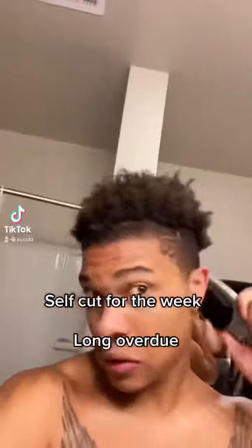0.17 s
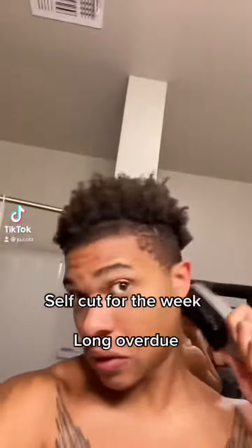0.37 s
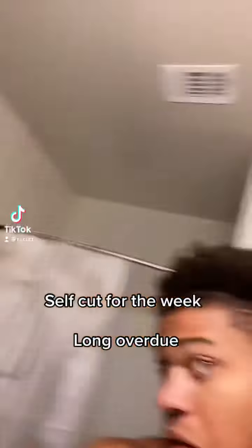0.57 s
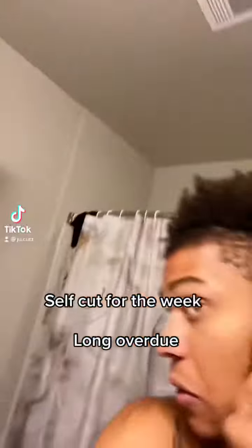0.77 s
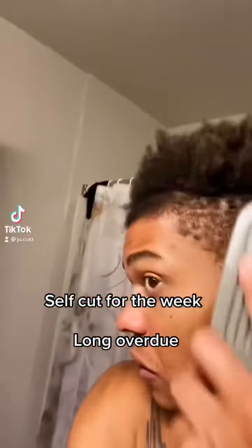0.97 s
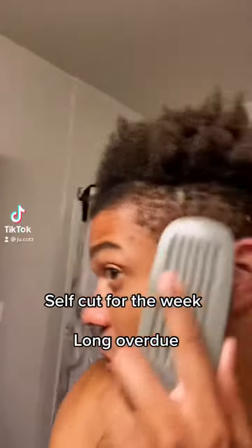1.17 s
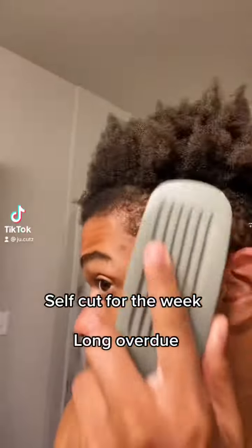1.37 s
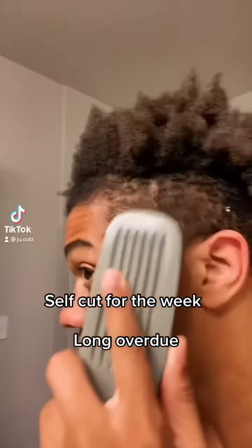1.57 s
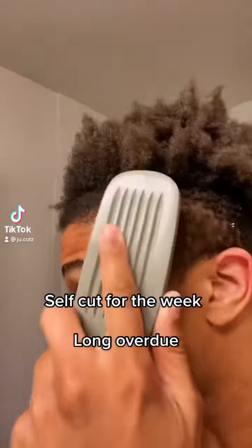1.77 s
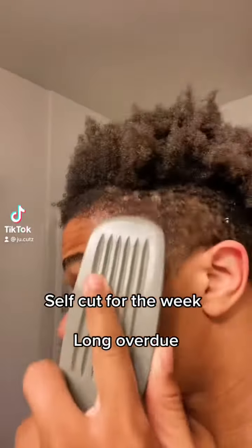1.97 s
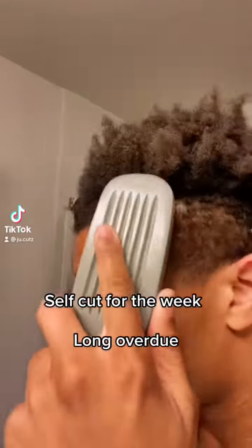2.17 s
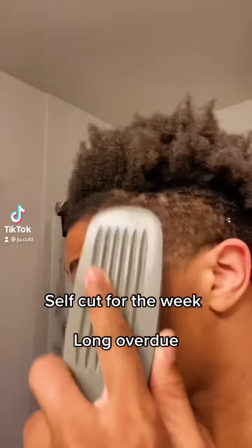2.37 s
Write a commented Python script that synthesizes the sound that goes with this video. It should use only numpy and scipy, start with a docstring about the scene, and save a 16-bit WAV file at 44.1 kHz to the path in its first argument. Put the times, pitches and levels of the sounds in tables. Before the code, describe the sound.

A bristle brush sweeps over short hair six times in a small bathroom, at about 0.3, 0.8, 1.2, 1.5, 1.9 and 2.3 seconds. Light scuffs come before most of these short, dry rasps. The second stroke is the loudest and crackles as bristles snag near 0.9 seconds. A low motor hum and rumble runs underneath, and a faint, thin whistle comes and goes between 0.5 and 1.5 seconds.

```python
"""A bristle brush is swept six times over short hair in a small bathroom.
Each stroke is thousands of tiny bristle flicks, ringing in the hollow between brush and head.
The brush touches down lightly before most strokes and snags most in the hardest one.
Behind it a mains motor (idling clippers or a ceiling fan) hums and rumbles,
and a thin whistle comes and goes."""
import sys
import numpy as np
from scipy import signal
from scipy.fft import rfft, irfft
from scipy.io import wavfile

SR = 44100
rng = np.random.default_rng(int(sys.argv[2]) if len(sys.argv) > 2 else 0)


def inscribe(sig):
    """Save sig as 16-bit PCM at rate SR to the path in sys.argv[1].

    A 1-D sig is mono; a 2-D sig holds one channel per row.
    Samples are clipped to [-1, 1] before scaling.
    """
    pcm = np.round(np.clip(np.atleast_2d(sig).T, -1, 1) * 32767)
    wavfile.write(sys.argv[1], SR, pcm.astype(np.int16))


N = 106854

# The tone of bristles rubbing on hair, from low to high: pitch_hz, level_db
BRISTLE_TONE = [(150, -24), (400, -8), (680, -13.5), (870, -4.5), (1100, -11.5), (1450, -5.5), (1800, -1.5),
                (2500, 0.5), (3200, -1), (4000, -6.5), (5400, -8.5), (6300, -12), (8200, -12),
                (10500, -16.5), (13000, -16.5), (16000, -21.5)]


def from_db(db):
    """Turn decibels into a number to multiply by."""
    return 10 ** (np.asarray(db) / 20)


def unit_power(x):
    """Scale a sound so that its average power is 1."""
    return x / np.sqrt(np.mean(x ** 2) + 1e-20)


def clock():
    """The time of every sample, in seconds."""
    return np.arange(N) / SR


def join_points(rows):
    """Draw straight lines between timed rows: one curve for each column after the time."""
    times, *columns = np.transpose(rows)
    return [np.interp(clock(), times, column) for column in columns]


def shape_tone(x, points):
    """Make each pitch as strong as a tone table says, with nothing below 20 Hz; power 1."""
    hz, db = np.transpose(points)
    freqs = np.maximum(np.fft.rfftfreq(N, 1 / SR), 1)
    gain = from_db(np.interp(np.log(freqs), np.log(hz), db)) * (freqs > 20)
    return unit_power(irfft(rfft(x) * gain, N))


def drift(turns_per_s):
    """A random wander, roughly between -1 and 1."""
    points = rng.standard_normal(500)
    return np.interp(clock() * turns_per_s, np.arange(len(points)), points)


def resonate(x, hz, width_hz):
    """Let a sound ring at one pitch; a narrower width rings longer."""
    r = np.exp(-np.pi * width_hz / SR)
    feed = np.array([1, 0, -1]) * (1 - r * r) / 2
    feedback = [1, -2 * r * np.cos(2 * np.pi * hz / SR), r * r]
    return signal.lfilter(feed, feedback, x + 1e-18)


def tone_knobs(x, bass_db=0, treble_db=0, sizzle_db=0):
    """Turn the bass, the treble and the sizzle at the very top up or down."""
    bass_hz, treble_hz, sizzle_hz = 1280, 3900, 11000
    freqs = np.fft.rfftfreq(N, 1 / SR)
    bass = 1 / (1 + (freqs / bass_hz) ** 4)
    treble = 1 - 1 / (1 + (freqs / treble_hz) ** 4)
    sizzle = 1 - 1 / (1 + (freqs / sizzle_hz) ** 12)
    return irfft(rfft(x) * from_db(bass_db * bass + treble_db * treble + sizzle_db * sizzle), N)


def motor():
    """A motor hums at twice the mains rate, over a rumble of moving air."""
    # How loud the motor is over time: time_s, hum_db, air_db
    levels = [(.115, -83, -86.5), (.165, -58.5, -63.5), (.24, -51, -60), (.42, -49, -58), (.65, -45.5, -54),
              (.8, -44.5, -49), (.96, -43.5, -50.5), (1.12, -48.5, -54.5), (1.35, -50.5, -57.5),
              (1.9, -51, -57.5), (2.42, -50.5, -57.5)]
    # The pure tones in the hum: multiple (of hum_hz), level_db
    hum_tones = [(1, -2.5), (2, -20.5), (3, -36)]
    # The tone of the moving air: pitch_hz, level_db
    air_tone = [(25, -16.5), (45, -9.5), (68, -2), (95, -7), (130, -12.5), (200, -19), (300, -16),
                (450, -18.5), (700, -21.5), (1500, -27.5), (3000, -32), (7000, -38.5), (15000, -49)]
    # The ringing of duct and room: pitch_hz, width_hz, level_db
    air_rings = [(71, 15, -3), (160.4, 5.6, -10), (292.4, 16, -10.5), (347, 4, -12.5)]
    hum_hz, waver_db = 120, 0.4
    hum_db, air_db = join_points(levels)
    hum = 0
    for multiple, level_db in hum_tones:
        gain = from_db(level_db + waver_db * drift(12.32)) * np.sqrt(2)
        hum += gain * np.sin(2 * np.pi * (multiple * hum_hz * clock() + rng.random()))
    air = shape_tone(rng.standard_normal(N), air_tone)
    for pitch_hz, width_hz, level_db in air_rings:
        air += from_db(level_db) * unit_power(resonate(rng.standard_normal(N), pitch_hz, width_hz))
    started = clock() > levels[0][0]
    return (from_db(hum_db) * hum + from_db(air_db) * unit_power(air)) * started


def whistle():
    """One thin, slightly unsteady tone swells and fades."""
    # How loud the whistle is over time: time_s, level_db
    levels = [(.4, -102), (.47, -70.5), (.62, -68), (.69, -56), (.75, -59.5), (.9, -65.5), (1.04, -63.5),
              (1.12, -64), (1.33, -86), (1.43, -77), (1.6, -97)]
    pitch_hz, waver_hz = 3604, 6.5
    level_db, = join_points(levels)
    cycles = np.cumsum(pitch_hz + waver_hz * drift(30)) / SR
    started = clock() > levels[0][0]
    return from_db(level_db) * np.sqrt(2) * np.sin(2 * np.pi * cycles) * started


def bathroom(x):
    """Close walls add a quick wash of echoes, whose treble lasts slightly longer."""
    low_fade_s, high_fade_s = 0.3, 0.36  # time to fall by 60 dB
    echo_db, delay_s, split_hz = -10, 0.004, 4000
    t = clock()[:SR // 2]
    noise = rng.standard_normal(len(t))
    low = signal.sosfilt(signal.butter(1, split_hz, fs=SR, output="sos"), noise)
    tail = low * from_db(-60 * t / low_fade_s) + (noise - low) * from_db(-60 * t / high_fade_s)
    tail *= t > delay_s
    return x + from_db(echo_db) * signal.fftconvolve(x, tail / np.linalg.norm(tail))[:N]


def pressure(start_s, length_s, rise_s, release_s):
    """The brush presses on smoothly, holds and lets go."""
    t = clock() - start_s
    press = (1 + np.tanh(t / (2 * rise_s))) / 2
    let_go = (1 - np.tanh((t - length_s) / (2 * release_s))) / 2
    return press * let_go


def bristles():
    """Countless bristle flicks of uneven size blur into a steady rasp."""
    flicks_per_s, spread_db = 15000, 2
    sizes = from_db(spread_db * np.minimum(rng.exponential(1, N), 5))
    signs = rng.choice([-1, 1], N)
    flicking = rng.random(N) < flicks_per_s / SR
    return shape_tone(sizes * signs * flicking, BRISTLE_TONE)


def graze(rasp):
    """On one return the brush barely touches the hair and rings faintly."""
    # The rings that this light contact stirs: pitch_hz, width_hz, level_db
    rings = [(1770, 130, -70), (2920, 160, -77), (3270, 82, -75)]
    ringing = sum(from_db(db) * unit_power(resonate(rasp, hz, width_hz)) for hz, width_hz, db in rings)
    return ringing * pressure(start_s=1.64, length_s=0.21, rise_s=0.013, release_s=0.02)


def touches(rasp):
    """The bristles land with short, light scuffs."""
    # Each landing of the brush: start_s, length_s, level_db, treble_db
    landings = [(0.676, 0.031, -53, 1), (0.714, 0.06, -56.5, 4), (1.074, 0.0096, -53, -3),
                (1.099, 0.079, -62.5, -5), (1.462, 0.03, -60, -5), (1.499, 0.034, -64.5, -14),
                (1.814, 0.025, -57.5, -5.5), (1.85, 0.067, -59.5, -10), (2.16, 0.013, -56, -9),
                (2.192, .005, -59, -12)]
    sound = 0
    for start_s, length_s, level_db, treble_db in landings:
        scuff = unit_power(tone_knobs(rasp, treble_db=treble_db))
        sound += scuff * from_db(level_db) * pressure(start_s, length_s, rise_s=0.0012, release_s=0.0082)
    return sound


def snags():
    """A caught tuft of bristles snaps free all at once: a burst that dies in milliseconds."""
    # Each tuft snapping free: start_s, level_db, decay_s, treble_db
    snaps = [(.540, -60, .001, 1), (.609, -51, 0.0015, -7), (0.685, -45.5, 0.0018, 18),
             (0.695, -56, .0015, 13), (0.7975, -43, .0015, -3), (.821, -43, 0.0014, 1),
             (.8425, -39, 0.002, 11), (0.852, -39.5, 0.0073, 7), (0.8615, -37, 0.0037, 4),
             (0.8758, -29, 0.0034, 8.5), (0.8847, -38, 0.0028, 10), (1.311, -53, .003, 6)]
    t = clock()
    burst = shape_tone(rng.standard_normal(N), BRISTLE_TONE)
    sound = 0
    for start_s, level_db, decay_s, treble_db in snaps:
        fade = (t >= start_s) * np.exp(-np.abs(t - start_s) / decay_s)
        sound += from_db(level_db) * fade * unit_power(tone_knobs(burst, treble_db=treble_db))
    return sound


def strokes(rasp):
    """Each sweep eases off or bears down as it goes, and rings in the hollow under the brush."""
    # Each sweep over the hair: start_s, length_s, rise_s, release_s, level_db,
    # easing_db_per_s (below 0 it grows louder), bass_db, treble_db, sizzle_db,
    # hollow_gain, hollow_1_hz, hollow_2_hz, upper_1_hz, upper_2_hz
    sweeps = [(.288, 0.11, 0.03, 0.027, -48, 11, 0.22, 4.5, 6, 0.65, 2270, 2450, 4600, 4960),
              (0.751, 0.15, 0.0072, 0.013, -43, -18, 0.91, 3.5, 1, 0.35, 2540, 2930, 5420, 6300),
              (1.153, 0.12, 0.011, 0.023, -46, 11, 0, 0.5, 1, 0.67, 2350, 2700, 5070, 7370),
              (1.542, 0.083, 0.014, 0.024, -45, 10, 0.53, -1, 3, 0.99, 2840, 2950, 6960, 7330),
              (1.885, 0.11, 0.0082, 0.016, -47.5, 21, 0.17, 0, 2.5, 0.87, 2170, 3160, 5400, 7100),
              (2.255, 0.1, 0.013, 0.021, -48, 23, 1, -0.5, 1.5, 0.65, 2330, 3250, 5060, 8260)]
    upper_gain = 1.3
    catch_db, catches_per_s = 1.5, 90  # the bristles catch and slip unevenly
    sound = 0
    for (start_s, length_s, rise_s, release_s, level_db, easing_db_per_s,
         bass_db, treble_db, sizzle_db, hollow_gain, *rings_hz) in sweeps:
        hollow = sum(resonate(rasp, hz, width_hz=150) for hz in rings_hz[:2])
        upper = sum(resonate(rasp, hz, width_hz=120) for hz in rings_hz[2:])
        ringing_rasp = rasp + hollow_gain * hollow + upper_gain * upper
        tone = unit_power(tone_knobs(ringing_rasp, bass_db, treble_db, sizzle_db))
        eased_db = easing_db_per_s * np.clip(clock() - start_s, 0, length_s)
        sound += tone * from_db(level_db - eased_db) * pressure(start_s, length_s, rise_s, release_s)
    return sound * from_db(catch_db * drift(catches_per_s))


def scene():
    """The brush and its bathroom echoes, over the motor and the whistle; one channel."""
    brush = strokes(bristles()) + touches(bristles()) + snags() + graze(bristles())
    return (bathroom(brush) + motor() + whistle())[None]


def record(dry):
    """Cut away the very highest treble steeply."""
    cutoff_hz = 15850
    return signal.sosfilt(signal.ellip(12, .1, 80, cutoff_hz, fs=SR, output="sos"), dry)


dry = scene()
out = record(dry)
inscribe(out)
```